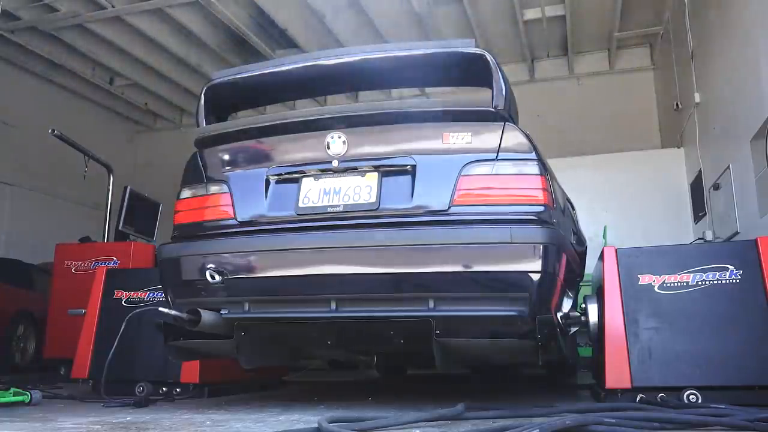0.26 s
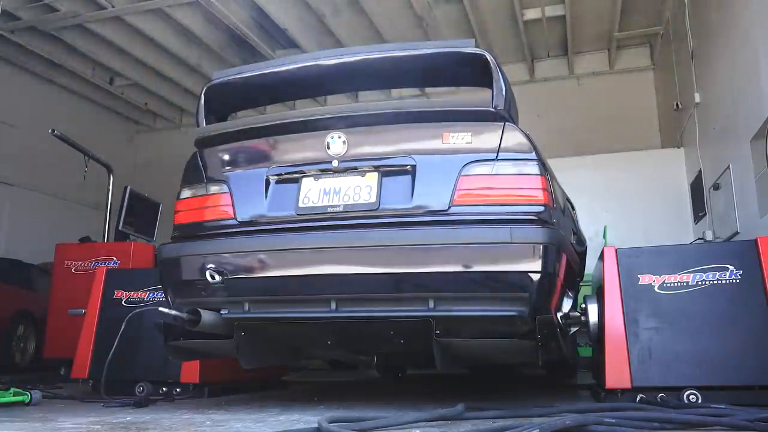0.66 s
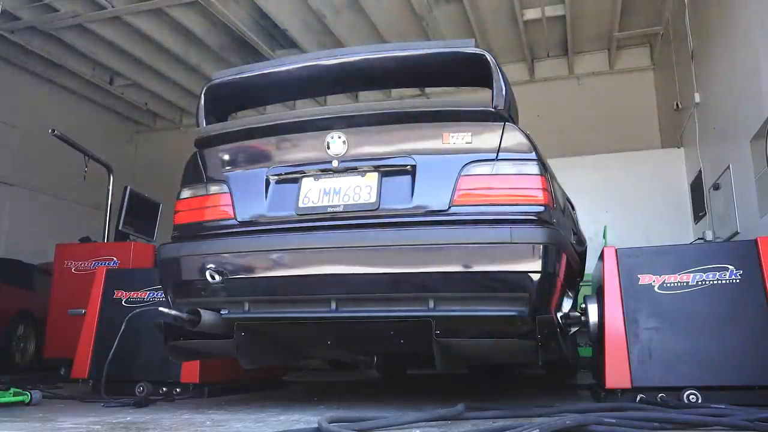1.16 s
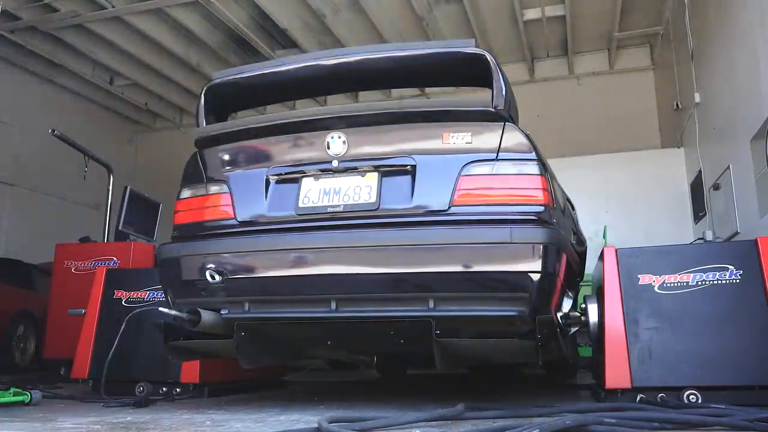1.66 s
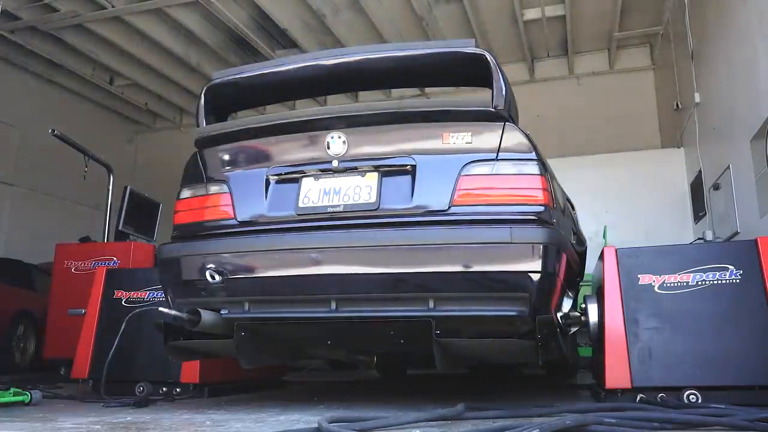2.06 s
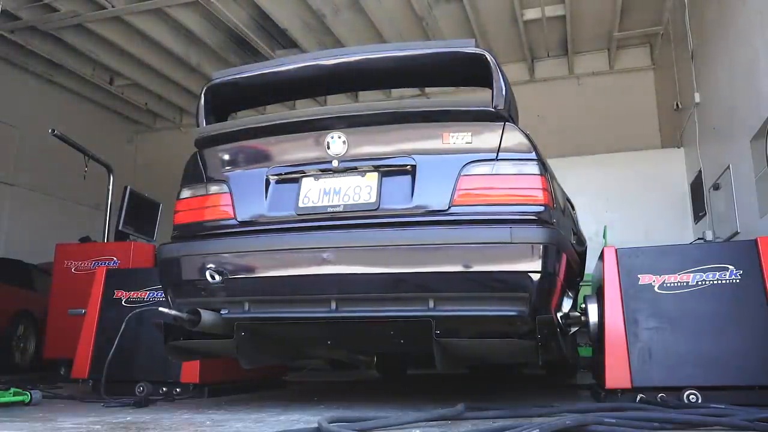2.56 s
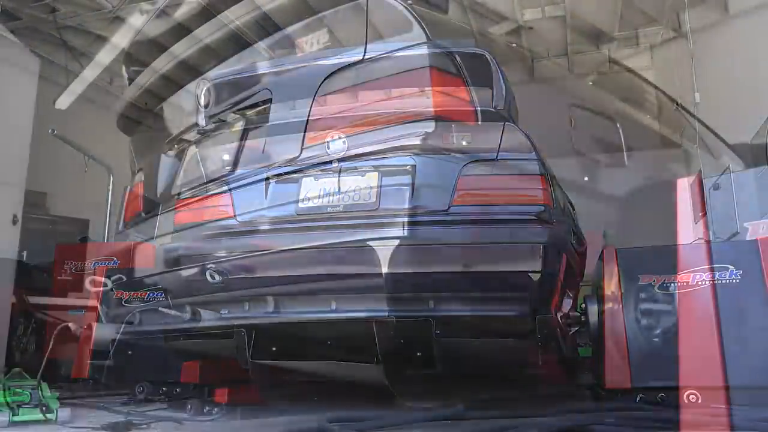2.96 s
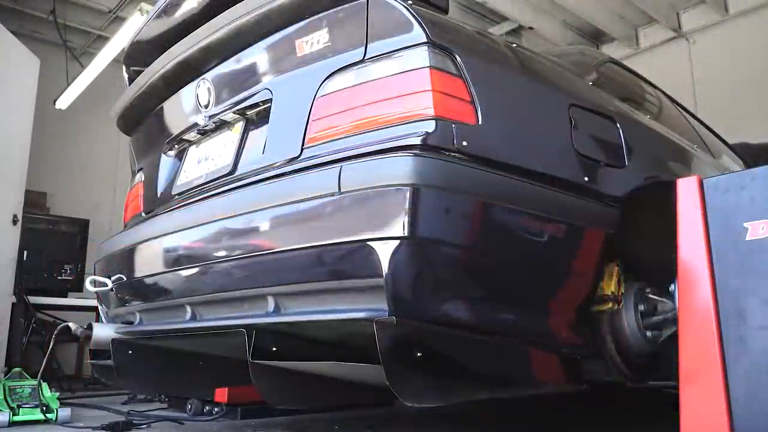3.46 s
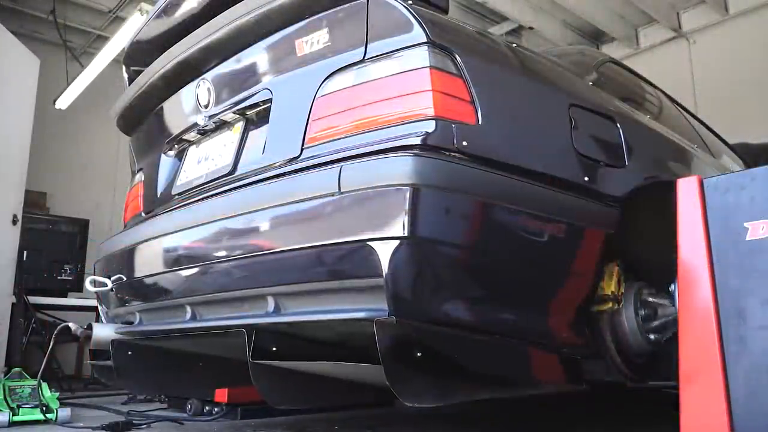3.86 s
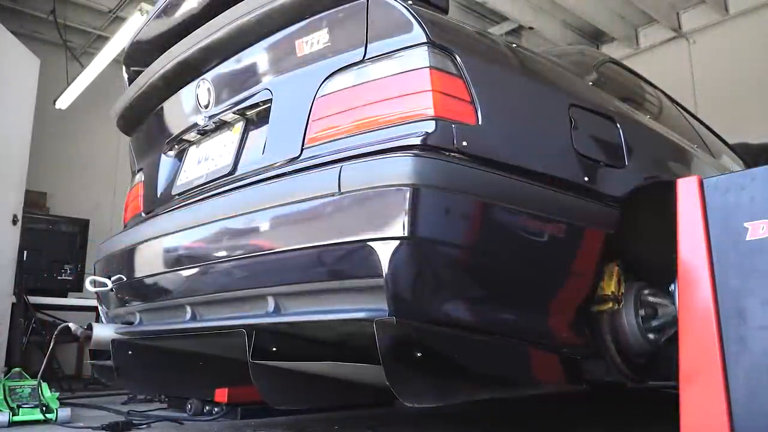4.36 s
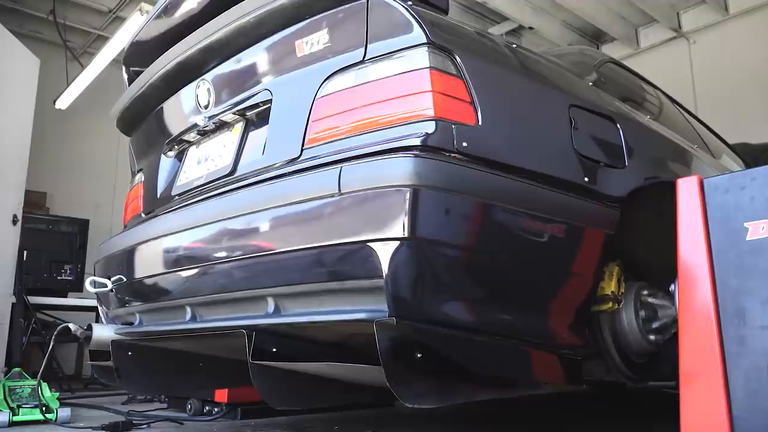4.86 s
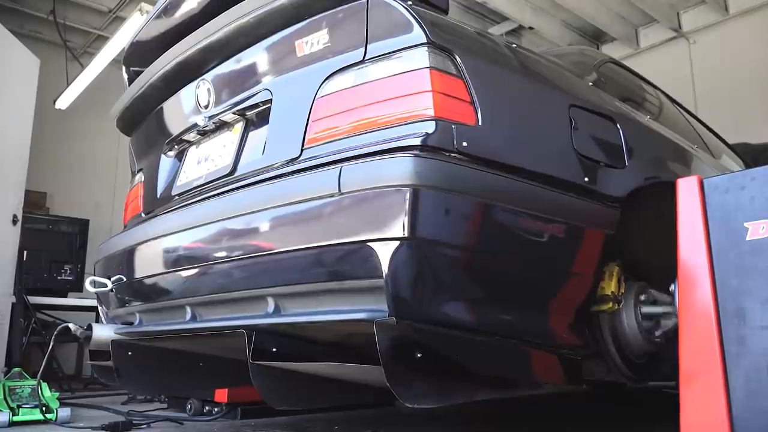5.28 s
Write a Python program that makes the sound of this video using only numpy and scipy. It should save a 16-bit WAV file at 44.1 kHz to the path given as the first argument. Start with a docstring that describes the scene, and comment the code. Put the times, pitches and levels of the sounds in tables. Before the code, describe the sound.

Behind a tailpipe, a six-cylinder engine winds down with spits and pops, idles briefly, then climbs hard into a distorted roar that backs off slightly.

```python
"""Falling revs and a burbling, crackling overrun, then idle; a cross-fade in tone leads to a pull that eases.
The source is a turbocharged straight-six on a dynamometer in a workshop, heard behind its tailpipe.
Crank-locked orders make boom and pipe note; uneven firing kicks make the burble; pulsed noise makes
chuff, rasp and hiss. Cracks, pops, surges, whistles, fans and gusts add to them; the loudest peaks overload.
"""
import sys
import numpy as np
from scipy import signal
from scipy.fft import rfft, irfft, next_fast_len
from scipy.io import wavfile
from scipy.ndimage import uniform_filter1d, map_coordinates

SR = 44100
rng = np.random.default_rng(int(sys.argv[2]) if len(sys.argv) > 2 else 0)


def dump(signal):
    """Clip the signal to [-1, 1] and save it as 16-bit WAV at the path in sys.argv[1]."""
    limited = np.clip(np.atleast_2d(signal).T, -1, 1)
    pcm = np.round(limited * 32767).astype(np.int16)
    wavfile.write(sys.argv[1], SR, pcm)


N = 243431
MID_REVS_HZ, MID_THRUST_DB, MID_FLOW_DB = 50, -18, -35  # reference bank rate, thrust and flow


def amp(db):
    """Decibels to gain."""
    return 10 ** (np.asarray(db) / 20)


def unit(x):
    """Scale to rms 1."""
    return x / np.sqrt(np.mean(x ** 2) + 1e-20)


def curves(rows):
    """One value per sample for each column after the time."""
    time_s, *columns = np.transpose(rows)
    return [np.interp(np.arange(N) / SR, time_s, column) for column in columns]


def wobble(rate_hz):
    """Smooth random curve, rate_hz knots a second."""
    knots = rng.standard_normal(int(N * rate_hz / SR) + 4)
    return map_coordinates(knots, [np.arange(N) * rate_hz / SR])


def along(points, hz):
    """Read (freq_hz, level_db) points on a log frequency axis."""
    freq_hz, level_db = np.transpose(points)
    return np.interp(np.log(hz + 1), np.log(freq_hz + 1), level_db)


def filtered(x, response):
    """Multiply the spectrum of x by a response of frequency."""
    size = next_fast_len(N + SR // 4)
    spectrum = rfft(x, size) * response(np.fft.rfftfreq(size, 1 / SR))
    return irfft(spectrum, size)[:N]


def coloured(x, points):
    """Filter x by a (freq_hz, level_db) curve."""
    return filtered(x, lambda hz: amp(along(points, hz)))


def running_rms(x):
    """Level over an eighth of a second."""
    return np.sqrt(np.abs(uniform_filter1d(x ** 2, size=SR // 8)) + 1e-14)


def dense_tail(x, wet_db, t60_s):
    """Add a decaying noise tail, as many overlapping reflections give."""
    t = np.arange(SR // 2) / SR
    tail = rng.standard_normal(len(t)) * amp(-60 * t / t60_s) * (t > .004)
    return x + amp(wet_db) * signal.fftconvolve(x, tail / np.linalg.norm(tail))[:N]


# Cross-fade from the first part (overrun and idle) to the second (pull): time_s, share_of_second (0-1)
PULL_SHARE = [(2.6, 0.03), (3.15, 0.92)]


def crossfade(first, second):
    """Blend from the first part's value (overrun and idle) to the second's (pull)."""
    share = np.clip(curves(PULL_SHARE)[0], 0, 1)
    return (1 - share) * first + share * second


def coloured_by_part(x, first, second):
    """Hold x at a steady level while its colour cross-fades between the parts."""
    y = crossfade(unit(coloured(x, first)), unit(coloured(x, second)))
    return y / running_rms(y)


# Dynamometer cooling-fan spectrum: freq_hz, level_db
FAN_SPECTRUM = [(410, -45), (700, -9), (896, 0), (956, -8), (1520, 0), (1980, -8), (2880, -8.5),
                (3110, -10), (3500, -5.5), (4190, -21.5), (4770, -14), (6270, -24), (6860, -28),
                (8440, -29), (15500, -41.5)]


def fans():
    """Cooling air: coloured noise with a slow random level."""
    rush = unit(coloured(rng.standard_normal(N), FAN_SPECTRUM))
    return amp(-53.5 + 0.66 * wobble(6.3)) * rush


# Gusts on the microphone: peak_s, width_s, peak_db
GUST_SWELLS = [(.05, 0.12, -39), (.6, 0.14, -44), (1.17, .2, -36), (1.44, 0.12, -29.5), (1.63, .05, -29),
               (1.89, 0.069, -26), (2.48, 0.059, -29), (4.13, .08, -36), (4.72, .2, -43)]
# Buffeting spectrum: freq_hz, level_db
BUFFET_SPECTRUM = [(4, -7), (12, -2.5), (25, 12), (45, -4), (90, -29.5), (250, -105.5)]
DRAUGHT_DB, DRAUGHT_DB_PER_OCTAVE = -45, 3  # steady draught grows with revs


def gusts(bank_hz):
    """Exhaust gas over the microphone: low noise with a faint draught and a few swells."""
    t = np.arange(N) / SR
    draught = amp(DRAUGHT_DB + DRAUGHT_DB_PER_OCTAVE * np.log2(bank_hz / MID_REVS_HZ))
    swells = sum(amp(peak_db) * np.exp(-((t - peak_s) / width_s) ** 2)
                 for peak_s, width_s, peak_db in GUST_SWELLS)
    lumps = coloured(rng.standard_normal(N), BUFFET_SPECTRUM)
    return (draught + swells) * lumps / running_rms(lumps)


def narrow(hz, width_hz):
    """Fuzzy line of rms 1: random quadrature amplitudes spread a pitch."""
    angle = 2 * np.pi * np.cumsum(hz * np.ones(N)) / SR
    return unit(wobble(width_hz) * np.cos(angle) + wobble(width_hz) * np.sin(angle))


# Turbo running down: time_s, pitch_hz, relative_db
TURBO_TRACK = [(.3, 14460, -88), (.47, 14100, -63), (.56, 13900, -63), (.78, 13130, -65), (.9, 13000, -67),
               (1.1, 13000, -77), (1.25, 12400, -90)]


def turbo_whistle():
    """Turbo whistle: a fuzzy line that falls in pitch and fades."""
    pitch_hz, relative_db = curves(TURBO_TRACK)
    return amp(relative_db - 5) * narrow(pitch_hz, width_hz=800)


# Soft whine at idle: time_s, pitch_hz, level_db
WHINE_TRACK = [(1.55, 500, -72), (1.7, 550, -50), (1.8, 598, -46.5), (1.93, 600, -50.5), (2.07, 560, -45),
               (2.23, 495, -52), (2.45, 463.7, -66)]


def idle_whine():
    """Sine that swells and sinks, with a fluttering level."""
    pitch_hz, level_db = curves(WHINE_TRACK)
    return amp(level_db + 2.3 * wobble(25.4)) * np.sin(2 * np.pi * np.cumsum(pitch_hz) / SR)


# Thin, high chirps as revs fall: peak_s, relative_db, pitch_hz
CHIRP_EVENTS = [(.195, -50, 12300), (.915, -50, 11900), (.993, -56, 11300), (1.074, -54, 11300),
                (1.162, -53, 11200), (1.295, -54, 7900), (1.383, -58, 8200)]


def chirps():
    """Short Gaussian bursts of a fixed pitch, blurred by random amplitude."""
    t = np.arange(N) / SR
    out, fuzz = np.zeros(N), wobble(700)
    for peak_s, relative_db, pitch_hz in CHIRP_EVENTS:
        envelope = amp(relative_db - 6) * np.exp(-((t - peak_s) / .004) ** 2)
        out += envelope * fuzz * np.sin(2 * np.pi * pitch_hz * t)
    return out


# Lowest pipe resonance, as falling revs pass through it: peak_s, relative_db, pitch_hz
SURGE_EVENTS = [(.83, -21, 175), (.93, -17, 165), (1.01, -19, 150), (1.044, -13, 142), (1.135, -7.5, 140),
                (1.22, -12.5, 140), (1.28, -17.5, 138), (1.445, -18.5, 138), (1.62, -24, 138)]


def surges():
    """The resonance builds over a few cycles and dies away: Gaussian-swelled sines."""
    t = np.arange(N) / SR
    out, width_s = np.zeros(N), 0.017
    for peak_s, relative_db, pitch_hz in SURGE_EVENTS:
        swell = amp(relative_db - 0.5) * np.exp(-((t - peak_s) / width_s) ** 2)
        out += swell * np.sin(2 * np.pi * (pitch_hz * t + rng.random()))
    return out


# Late-burning charges: start_s, relative_db
POP_EVENTS = [(1.21, -25.5), (1.356, -52), (1.489, -29), (1.609, -28), (1.728, -24.5), (1.962, -28),
              (2.459, -33), (2.70, -35)]
# Pipe modes they ring: pitch_hz, relative_db, t60_s
PIPE_MODES = [(144.96, -1, 0.16), (292, -16, 0.27), (417, -5, .18), (466.4, 5, 0.19)]


def pops():
    """Late charges burn in the pipe: softly started, decaying modes."""
    out, t = np.zeros(N + SR), np.arange(SR // 2) / SR
    onset = 1 - np.exp(-t / 0.0072)
    for start_s, relative_db in POP_EVENTS:
        ring = sum(amp(mode_db - 60 * t / t60_s) * np.sin(2 * np.pi * (pitch_hz * t + rng.random()))
                   for pitch_hz, mode_db, t60_s in PIPE_MODES)
        out[round(start_s * SR):][:len(t)] += amp(relative_db - 4.0) * ring * onset
    return out[:N]


# Sharp cracks: tailpipe spits on the overrun, then overload snaps in the pull: start_s, relative_db
CRACK_EVENTS = [(.073, -30), (.203, -30), (.257, -34), (.384, -28), (.419, -28.5), (.594, -35),
                (.615, -29.5), (.677, -29.5), (.831, -28.5), (1.005, -28), (1.034, -30.5), (4.391, -23),
                (4.435, -20.5), (4.477, -20), (4.723, -13.5), (4.764, -18), (4.889, -24)]
FRONT_DB, FRONT_DECAY_S = (1, 9.5), 0.00036  # front gain (first part, second part)


def crackles():
    """Sharp cracks: a steep front plus a brief noise burst with a fixed colour."""
    bursts, fronts, t = np.zeros(N + SR), np.zeros(N + SR), np.arange(SR // 20) / SR
    for start_s, relative_db in CRACK_EVENTS:
        burst = amp(relative_db + 2.5 - 60 * t / 0.02) * rng.standard_normal(len(t))
        bursts[round(start_s * SR):][:len(t)] += burst
        fronts[round(start_s * SR):][:len(t)] += amp(relative_db) * np.exp(-t / FRONT_DECAY_S)
    burst_colour = [(150, -31), (450, 10.0), (1100, 7.5), (2500, -9.5), (5000, -21), (12000, -32.5)]
    front_colour = [(1500, 3), (12000, -13)]
    sharp = amp(crossfade(*FRONT_DB)) * coloured(fronts[:N], front_colour)
    return coloured(bursts[:N], burst_colour) + sharp


def puffs(turns, firing_db, bank_db, cycle_db, ragged_db):
    """Turbulence: noise surging at the firing, bank and engine-cycle rates, and at random."""
    angle = 2 * np.pi * turns
    surge_db = firing_db * np.cos(2 * angle) + bank_db * np.cos(angle)
    surge_db += cycle_db * np.cos(angle / 3) + ragged_db * wobble(170)
    return amp(surge_db) * rng.standard_normal(N)


# Hiss spectra, first part, second part: freq_hz, level_db
HISS_FIRST = [(1940, -18), (3300, -2), (4960, -5), (6310, -12), (8280, -7.5), (10400, -16.5),
              (13600, -19.5), (14700, -25), (15500, -24)]
HISS_SECOND = [(1940, -24), (3300, -1.5), (6910, -9), (8610, -8.5), (10800, -17.5), (14100, -20),
               (15500, -25.5)]


def hiss(turns):
    """Fine gas turbulence, only weakly pulsed."""
    gas = puffs(turns, firing_db=0.4, bank_db=-0.8, cycle_db=0.25, ragged_db=0.65)
    return coloured_by_part(gas, HISS_FIRST, HISS_SECOND)


# Rasp spectra, first part, second part: freq_hz, level_db
RASP_FIRST = [(380, -38), (640, -6.5), (770, -2.5), (860, -15), (980, -9), (1130, -9.5), (1300, -13),
              (1600, -16), (2200, -18), (3000, -25), (4500, -37.5), (9000, -120)]
RASP_SECOND = [(380, -39), (650, 1.5), (760, -17), (870, -8.5), (1030, 6.5), (1170, -6), (1320, -3.5),
               (1550, -8.5), (1740, -5.5), (2000, -17.5), (2400, -15), (3200, -29), (4800, -36.5),
               (10000, -120)]


def rasp(turns):
    """Mid-band gas turbulence pulsed by the firings."""
    gas = puffs(turns, firing_db=2.5, bank_db=0.25, cycle_db=1.0, ragged_db=2.0)
    return coloured_by_part(gas, RASP_FIRST, RASP_SECOND)


# Chuff spectra, first part, second part: freq_hz, level_db
CHUFF_FIRST = [(200, -71), (305, -18), (340, 1.5), (385, 10), (405, 6), (480, 9.5), (520, -1), (570, -5.5),
               (660, -10), (780, -19), (1400, -52.5), (2500, -120)]
CHUFF_SECOND = [(200, -50), (305, -27), (350, 8), (420, 1), (490, 3), (590, 3.5), (640, -6.5), (750, -2),
                (1400, -52), (2500, -120)]


def chuff(turns):
    """Hollow gas turbulence strongly pulsed by firing and bank."""
    gas = puffs(turns, firing_db=3.5, bank_db=2.0, cycle_db=-0.5, ragged_db=3.5)
    return coloured_by_part(gas, CHUFF_FIRST, CHUFF_SECOND)


# Burble spectra, first part, second part: freq_hz, level_db
BURBLE_FIRST = [(25, -39), (55, -7.5), (100, -1), (118, -22), (140, 1), (185, -2.5), (215, -12.5),
                (274, -2), (302, -17), (400, -59.5), (800, -120)]
BURBLE_SECOND = [(25, -34), (65, -17), (100, 2), (130, -2), (190, -1), (230, 17), (265, -5), (310, -15),
                 (450, -47.5), (900, -120)]


def burble(turns):
    """Chance differences between firings: random kicks with a dense ringing tail."""
    firings = np.flatnonzero(np.diff(np.floor(2 * turns)) > 0)
    kicks = np.zeros(N)
    kicks[firings] = rng.uniform(-1.38, 1, len(firings))
    return coloured_by_part(dense_tail(kicks, wet_db=8, t60_s=0.42), BURBLE_FIRST, BURBLE_SECOND)


# Pipe-note spectra, first part, second part: freq_hz, level_db
PIPE_FIRST = [(30, -35.5), (70, -13), (150, 14), (215, 6), (275, 4), (308, -8), (345, 2), (480, -7),
              (560, -11.5), (750, -20), (1100, -24.5), (2000, -42.5), (5000, -120)]
PIPE_SECOND = [(35, -28), (120, -3.5), (155, -0.5), (235, 7), (280, 4), (345, -0.5), (420, -14.5),
               (495, -1), (640, -11.5), (880, -14.5), (1040, -18.5), (1400, -27.5), (3000, -35),
               (7000, -120)]


def pipe_note(turns, bank_db, uneven_db, scatter_rad, ring_db):
    """Unequal banks and cylinders put lines between the firing harmonics of one engine cycle."""
    # k: multiple of the six-cylinder cycle; every sixth a firing, every third a bank harmonic
    k = np.arange(2049)
    between_firings = np.where(k % 3 == 0, amp(bank_db), amp(uneven_db))
    gain = np.where(k % 6 == 0, 1, between_firings)
    gain[[0, 6, 9, 12, 18]] = 0  # no DC; boom() plays the rest
    gain[240:] = 0
    gain[45] = amp(ring_db)  # one high order sings
    phase = rng.standard_normal(len(k)) * np.where(k % 3 == 0, scatter_rad, np.pi)
    cycle = irfft(-1j * gain * np.exp(1j * phase))
    wave = np.interp(turns / 3, np.arange(len(cycle)) / len(cycle), cycle, period=1)
    return coloured_by_part(wave, PIPE_FIRST, PIPE_SECOND)


# Boom orders: bank_rate_multiple, relative_db, gain_db_per_octave of revs
BOOM_LINES = [(2, 1, 3.8), (3, -4.5, 8), (4, 1, 2.1), (6, -3.5, -2.5)]
# Pipe resonances the orders sweep through, first part, second part: freq_hz, level_db
BOOM_PIPE_FIRST = [(48, -40), (60, -28.5), (88, -24), (105, -29), (120, -23), (137, -18), (160, -25),
                   (195, -22), (225, -36.5), (265, -25.5), (320, -35.5)]
BOOM_PIPE_SECOND = [(65, -41.5), (90, -24.5), (101, -22), (109, -35), (119, -26.5), (145, -20), (195, -22),
                    (232, -19), (262, -26), (298, -29), (335, -18), (420, -24.5)]


def boom(turns, bank_hz, flutter_db, dispersion_rad):
    """Strong low orders swelled by pipe resonances; phase lag grows as order squared."""
    out = np.zeros(N)
    octaves = np.log2(bank_hz / MID_REVS_HZ)
    for multiple, relative_db, db_per_octave in BOOM_LINES:
        order_hz = multiple * bank_hz
        pipe_db = crossfade(along(BOOM_PIPE_FIRST, order_hz), along(BOOM_PIPE_SECOND, order_hz))
        level_db = relative_db + pipe_db + db_per_octave * octaves + flutter_db * wobble(22)
        phase = 2 * np.pi * multiple * turns - dispersion_rad * multiple ** 2
        out += np.sqrt(2) * amp(level_db) * np.sin(phase)
    return out


# Puff rate of one three-cylinder bank, half the firing rate: time_s, bank_rate_hz
BANK_RATE = [(0.0, 68.34), (0.1, 62.1), (0.36, 54.28), (0.7, 47.54), (0.8, 43.83), (0.9, 40.66),
             (1.12, 34.31), (1.25, 30.2), (1.55, 25.76), (2.1, 24.08), (2.58, 23.83), (2.78, 33.95),
             (3.25, 40.64), (3.92, 53.2), (4.35, 66.86), (4.55, 71.85), (4.76, 75.42), (4.92, 67.34),
             (5.03, 65.58), (5.52, 64.05)]
# How hard the exhaust works: time_s, bass_drive_db
BASS_THRUST = [(0.0, -15), (0.3, -17.5), (0.58, -24), (0.72, -24.5), (0.85, -20), (1.15, -21.5),
               (1.45, -23.5), (1.85, -29), (2.0, -29), (2.65, -27.0), (3.05, -19), (3.55, -17.5),
               (3.95, -15), (4.12, -12.5), (4.38, -15), (4.75, -16), (5.0, -16), (5.52, -14.5)]
# Gas leaving the pipe: time_s, chuff_drive_db, rasp_drive_db
GAS_FLOW = [(0.0, -27.5, -31.7), (0.15, -28, -37), (0.42, -25.2, -40.5), (0.75, -24, -42),
            (1.05, -31.0, -43), (1.35, -36.5, -48.5), (1.6, -41, -52.5), (2.2, -43.8, -55),
            (2.6, -45.5, -51), (2.9, -36, -45), (3.45, -22.5, -34), (3.92, -26, -31.5), (4.05, -20, -30),
            (4.4, -22, -26.5), (4.78, -20, -24.5), (5.0, -22, -28.5), (5.52, -25, -29.5)]
# Pairs are (first part, second part)
NOTE_DB, NOTE_DB_PER_OCTAVE = (-6.5, -5), 5  # note firms up with revs
CHUFF_DB, RASP_DB, HISS_DB = (-1.5, -6.5), (-3, -3), (-53.5, -49)
CHUFF_DB_PER_OCTAVE = (1.2, -2)  # in the pull, chuff gives way to the note as revs rise
BOOM_DB_PER_THRUST_DB, RASP_DB_PER_FLOW_DB, HISS_DB_PER_FLOW_DB = 0.8, 1.054, (0.62, 0.54)
BURBLE_DB = (-3, -4)
ROUGHEST_HZ, ROUGH_WIDTH_HZ = 42.2, 6.8  # firing most uneven at middling revs; 1 dB less at this distance


def scene():
    """Crank speed paces the exhaust; thrust drives the low layers, gas flow the noisy ones."""
    bank_hz, = curves(BANK_RATE)
    thrust_db, = curves(BASS_THRUST)
    hollow_db, flow_db = curves(GAS_FLOW)
    octaves = np.log2(bank_hz / MID_REVS_HZ)
    flow_excess_db = flow_db - MID_FLOW_DB

    boom_db = BOOM_DB_PER_THRUST_DB * (thrust_db - MID_THRUST_DB)
    note_db = thrust_db + crossfade(*NOTE_DB) + NOTE_DB_PER_OCTAVE * octaves
    burble_db = thrust_db + crossfade(*BURBLE_DB) - ((bank_hz - ROUGHEST_HZ) / ROUGH_WIDTH_HZ) ** 2
    chuff_db = hollow_db + crossfade(*CHUFF_DB) + crossfade(*CHUFF_DB_PER_OCTAVE) * octaves
    rasp_db = MID_FLOW_DB + RASP_DB_PER_FLOW_DB * flow_excess_db + crossfade(*RASP_DB)
    hiss_db = crossfade(*HISS_DB_PER_FLOW_DB) * flow_excess_db + crossfade(*HISS_DB)

    # bank puffs so far; the crank never turns quite evenly
    turns = np.cumsum(bank_hz) / SR + .003 * wobble(50)
    note = amp(note_db) * pipe_note(turns, bank_db=1.0, uneven_db=-8.0, scatter_rad=1.25, ring_db=3)
    gas = amp(chuff_db) * chuff(turns) + amp(rasp_db) * rasp(turns)
    # floor and walls add the tail
    engine = dense_tail(note + gas + crackles(), wet_db=-9.5, t60_s=0.32)
    engine += amp(burble_db) * burble(turns)
    # boom and hiss reach the microphone directly
    direct = amp(boom_db) * boom(turns, bank_hz, flutter_db=1.44, dispersion_rad=.75)
    direct += amp(hiss_db) * hiss(turns)
    whistles = turbo_whistle() + idle_whine() + chirps()
    return (engine + direct + pops() + surges() + whistles + fans() + gusts(bank_hz))[None]


DIP_S, DIP_WIDTH_S, DIP_DB = 1.879, .006, -18  # level dips briefly near the top of a gust
CEILING, HARDNESS = .45, 4.5  # overload level (full scale 1), knee exponent
COUPLING_HZ, TOP_HZ = 24, 15720


def record(dry):
    """Input stage rounds off peaks, its coupling tilts their tops, and the band is limited."""
    t = np.arange(N) / SR
    x = dry[0] * amp(DIP_DB * np.exp(-((t - DIP_S) / DIP_WIDTH_S) ** 2))
    clipped = x / (1 + np.abs(x / CEILING) ** HARDNESS) ** (1 / HARDNESS)
    coupled = filtered(clipped, lambda hz: 1j * hz / (COUPLING_HZ + 1j * hz))
    return filtered(coupled, lambda hz: hz < TOP_HZ)[None]


dry = scene()
out = record(dry)
dump(out)
```